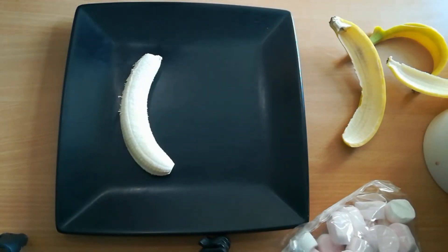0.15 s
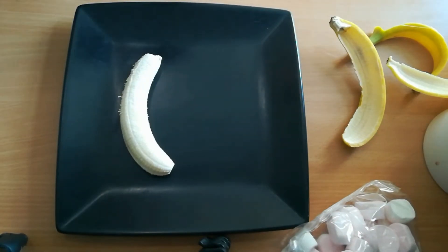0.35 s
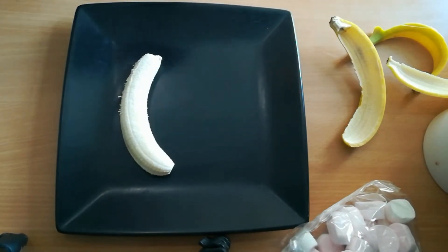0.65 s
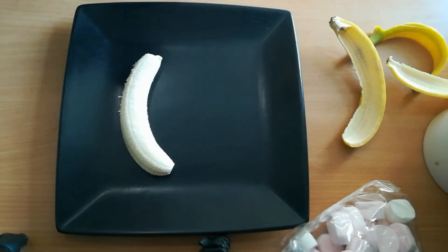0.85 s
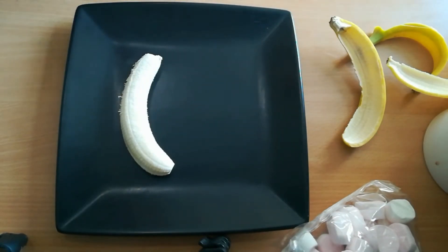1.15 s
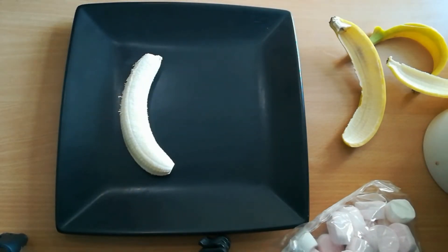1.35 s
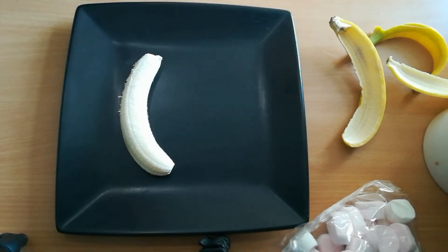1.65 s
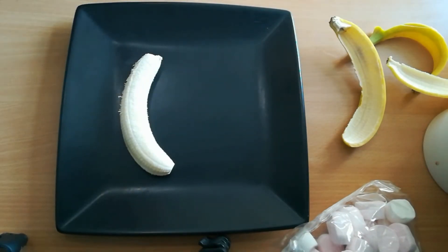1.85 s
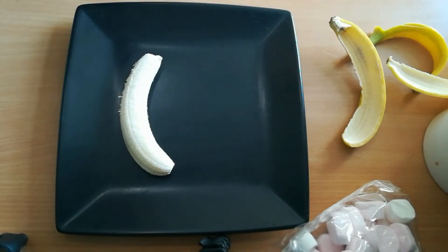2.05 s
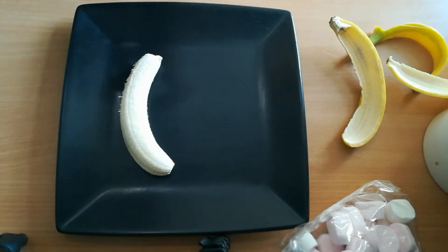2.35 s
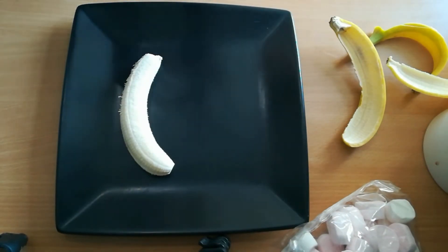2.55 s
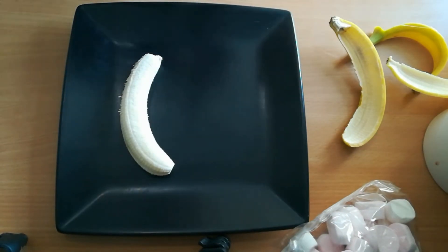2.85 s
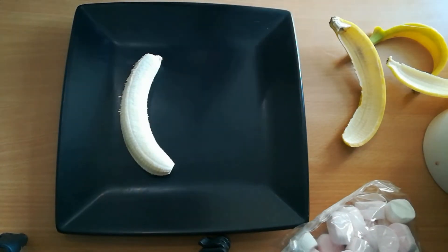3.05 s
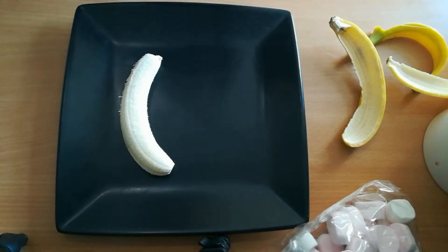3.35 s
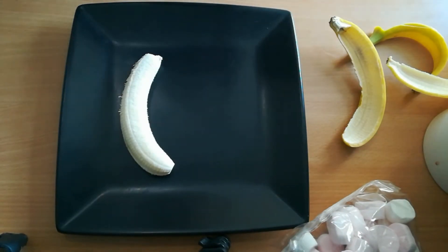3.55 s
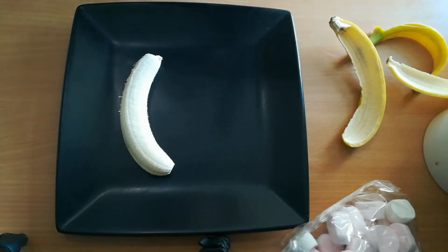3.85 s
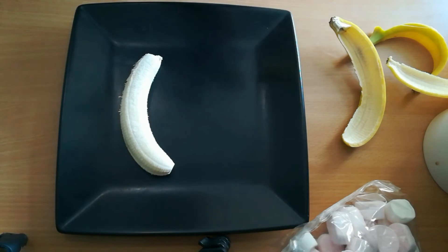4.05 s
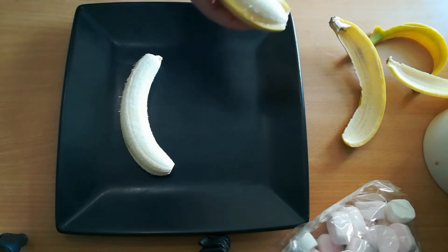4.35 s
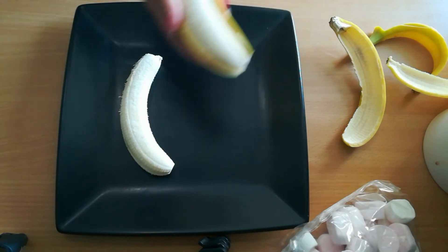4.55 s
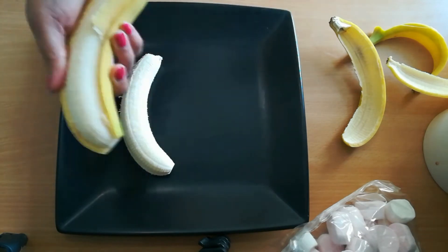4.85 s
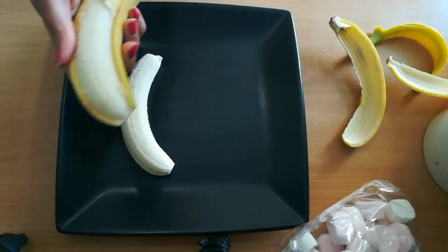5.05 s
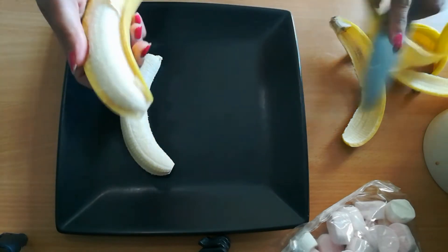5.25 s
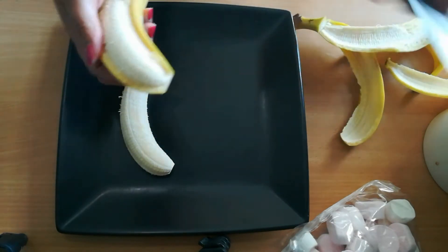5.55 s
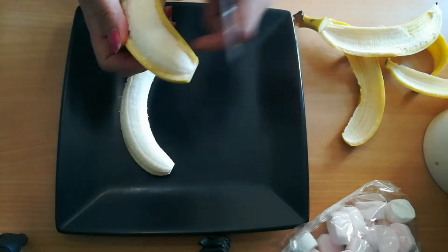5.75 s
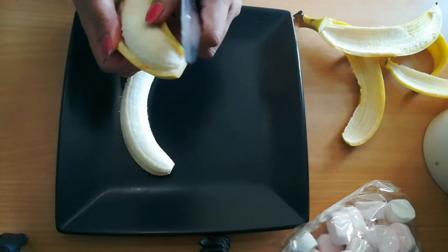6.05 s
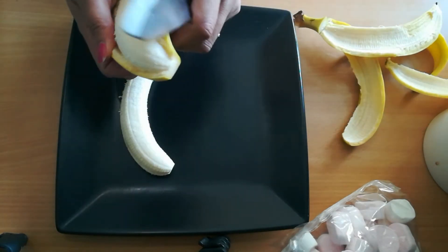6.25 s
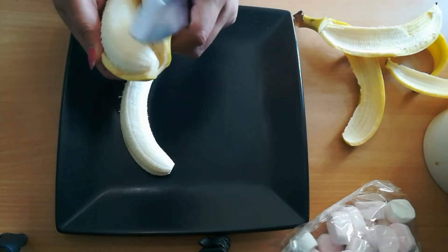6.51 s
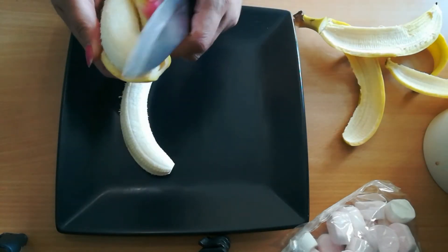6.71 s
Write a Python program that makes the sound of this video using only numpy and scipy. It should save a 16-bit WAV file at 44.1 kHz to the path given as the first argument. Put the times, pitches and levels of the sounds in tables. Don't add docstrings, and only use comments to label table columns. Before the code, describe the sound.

Close up in a small hard room, a knife bangs down loudly, metal rocks to rest, and fruit peel is torn with short dry crackling.

```python
import sys
import numpy as np
from scipy import signal
from scipy.fft import rfft, irfft, next_fast_len
from scipy.io import wavfile

SR = 44100
rng = np.random.default_rng(int(sys.argv[2]) if len(sys.argv) > 2 else 0)


def output_pcm(signal):
    pcm = np.clip(np.atleast_2d(signal).T, -1, 1) * 32767
    wavfile.write(sys.argv[1], SR, np.round(pcm).astype(np.int16))


def invert_db(level):
    return 10 ** (np.asarray(level, dtype=float) / 20)


N = 303275

# time in seconds, rumble level in dB.
STIR = [(0.0, -45.5), (0.48, -57.5), (0.62, -53), (1.25, -58), (1.7, -54), (2.45, -61), (2.7, -62),
        (5.95, -64), (6.09, -57), (6.22, -48.5), (6.4, -53.5), (6.61, -56.5), (6.88, -58)]
# frequency in Hz, width in Hz, level in dB.
RUMBLE_MODES = [(22.6, 5.6, 1.8), (52, 19, -3), (119.5, 8.2, 1.5), (160, 12, 0), (223, 14, -15)]
# frequency in Hz, level in dB per Hz.
HISS = [(120, -45.5), (200, -11.5), (387, -4.5), (473, -11), (509, -8.5), (899, -14), (1300, -12),
        (2470, -19.5), (2650, -17.5), (16000, -26)]
# frequency in Hz, level in dB rms.
HUM = [(879, -82.5), (14800, -97.5)]
QUIET_DB, HISS_DB = -64, -74
HISS_FOLLOWS = 0.44

# frequency in Hz, T60 in seconds.
ROOM_T60 = [(100, 0.75), (500, 0.49), (2000, 0.44), (6000, 0.34), (14000, 0.22)]
# time in seconds, lateness at the left microphone in samples,
# left-right difference in dB.
PLACE = [(0, 17, -0.96), (2.45, 15.5, -0.7), (2.6, -1.5, 0), (3.4, -1.36, 0.75), (4.2, -1, 4.5),
         (4.6, -1.5, -1.3), (5.0, 27.5, 5), (6.6, 29, -1.5), (6.7, -23.5, 3.5)]
HARD_WET_DB = -.5

SQUEAL_HZ = (3296, 3165, 2450)
# start in seconds, length in seconds, level in dB rms.
SQUEALS = [
    [(3.27, 0.11, -67), (3.44, .31, -60.5), (6.02, 0.21, -63.5), (6.22, 0.16, -61), (6.36, 0.2, -72.5)],
    [(5.87, 0.12, -75), (5.98, 0.079, -63.5), (6.16, 0.093, -80.5)],
    [(5.4, 0.41, -89.5), (6.0, 0.47, -81.5)],
]
SQUEAL_EDGE_S = 0.035

# time in seconds, peak in dB, upper modes in dB re peak.
ROCKS = [(2.2876, -44, 0), (2.3993, -44.5, -1), (2.5363, -57.5, -2), (2.7013, -67.5, 7.5),
         (2.827, -60.5, 1), (2.9507, -66.5, 2), (3.0541, -68.5, 5.5), (3.0984, -72, -14),
         (3.1458, -61.5, 3), (3.282, -71, -6)]
# frequency in Hz, level in dB, T60 in seconds.
STEEL = [(1125, -3, .2), (1172, 0, .25), (1228, -1, .2), (1275, -1, .2), (1570, -8, .2), (2392, 0, .25),
         (2445, -5, .2), (2487, -4, .2)]

# start in seconds, hold in seconds,
# clatter level in dB, dull part in dB re clatter, top part in dB re clatter.
CLATTER = [(0.137, 0.062, -53, 0, -21.5), (0.307, 0.0083, -17, -5.5, -13.5), (0.42, 0.088, -70.5, 24, -9),
           (0.72, 0.41, -73.5, 9, -4), (1.765, 0.005, -30, 6, -12.5), (1.941, 0.005, -10, -8.5, -12.5),
           (1.965, 0.01, -19.5, -8.5, -7), (2.026, 0.0054, -13.5, -6, -10), (2.12, 0.04, -46, 2.5, -36),
           (2.378, 0.0057, -37.5, -14, -14.5)]
CLATTER_FADE_DB_PER_S = 215.5
RISE_S = 0.0043

# time in seconds, peak in dB, then deep boom, thud and mid body in dB re peak.
KNOCKS = [(0.1375, -29, -36.5, -12.5, -39), (0.306, -7, -18.5, -22, -42), (0.3248, -8.5, -7, -8, -15.5),
          (0.455, -51.5, 21, 16.5, -14), (0.7434, -66, 23, 12.5, 15), (0.98, -63, 5, 11.5, 8),
          (1.1294, -54.5, -15, 1.5, 0.5), (1.7611, 1, -31, -24.5, -13.5), (1.8673, -9, -24.5, -28, -12.5),
          (1.8887, -11, -23, -27.5, -13.5), (1.9405, 7.5, -29, -26, -21), (1.964, -8, -15.5, -20.5, -25.5),
          (2.0256, -6, -14, -18.5, -23.5), (2.293, -27.5, -21, -14.5, -21), (2.34, -37.5, -6.5, -3, -7.5),
          (2.376, -16, -32.5, -30.5, -15), (5.3175, -61, -2, 1.5, -12.5)]
# frequency in Hz, level in dB per Hz.
CRACK = [(180, -27.5), (300, -7.5), (1010, 2.5), (1410, 1.5), (2280, -7), (4020, -1), (7820, -20),
         (14700, -32), (16000, -34)]
# frequency in Hz, level in dB, T60 in seconds.
TABLE = [(44.6, -12.5, .5), (80.4, -5.5, 0.3), (102, -2.5, .45), (129.2, -1.5, 0.33), (161.1, -5, .3),
         (202.55, -1.7, 0.25), (232, -3, 0.5), (246.2, -1.5, 0.38), (289, -11, 0.087), (324, -9.5, .2),
         (395, -13, 0.49)]
# frequency in Hz, level in dB, T60 in seconds.
BOARD = [(500, -6, .05), (620, -6, .05), (790, .3, .08), (930, -3, .05), (1180, -4, .04), (1425, -2, .05)]
# frequency in Hz, level in dB, T60 in seconds.
BLADE = [(2160, -12, .12), (2420, -23, .3), (2830, -9, .1), (4350, -8, .35), (4750, -9, .1),
         (5300, -6, .08), (5400, -4, .1), (5535, -6, .22), (5650, -5, .2), (5690, -4, .12),
         (7800, -12, .08), (8660, -10, .08), (8860, -9, .12)]
# time in seconds, peak in dB.
CLINKS = [
    (0.3092, -27),
    (1.9644, -4),
    (2.0248, -4),
    (2.2957, -39.5),
]

# time in seconds, peak in dB, centre in Hz, top crack in dB re peak.
SNAPS = [(0.2146, -37.5, 4800, -18), (0.5248, -40.5, 5200, -10.5), (1.0802, -39.5, 3550, -12),
         (1.0949, -37.5, 5100, 11), (1.25, -51, 5680, -13.5), (1.472, -17, 6000, -8.5),
         (1.5262, -11.5, 5780, 3), (2.6471, -35, 9100, 22), (3.1971, -27.5, 5230, -18),
         (3.2192, -26.5, 5050, 3), (3.2464, -22, 5260, -4.5), (3.3722, -12.5, 5150, -3),
         (3.428, -21, 6200, -1), (3.4885, -25.5, 5300, 1), (3.55, -27.5, 6100, 3.5),
         (3.6493, -37, 5800, -6), (3.689, -30.5, 4750, 11), (3.7586, -32.5, 6160, -5), (3.8, -44, 6640, 8),
         (4.0611, -27, 5600, -12), (4.5636, -40, 6300, -17), (4.577, -35, 5400, -4),
         (4.597, -32.5, 4830, 0.5), (5.082, -51.5, 2870, -10), (5.1737, -44, 5430, -10.5),
         (6.1054, -51.5, 6126, -22), (6.2656, -39.5, 5300, -24), (6.4378, -49.5, 4500, -13.5),
         (6.607, -56.5, 5240, -20.5), (6.77, -30.5, 7670, 4)]
SNAP_S = 0.0023

# frequency in Hz, width in Hz, level in dB.
SKIN = [(1800, 550, 0), (3150, 1400, -5), (5300, 2300, 0), (8500, 6000, -7), (14000, 9000, -7)]
# start in seconds, hold in seconds, crackle level in dB,
# dull part in dB re crackle, top part in dB re crackle.
TEARS = [(1.09, .012, -60, -4, 5), (1.472, 0.024, -35.5, -7, 4), (1.498, 0.034, -35.5, -15, 10.5),
         (2.647, 0.021, -67.5, -21.5, 9.5), (3.197, 0.016, -35.5, -19, -10.5), (3.244, .006, -57, -31, -8),
         (3.36, 0.013, -27.5, -13, -3), (3.39, 0.053, -60, 4, -9), (5.2, 0.026, -60.5, -12, -1.3)]
TEAR_FADE_DB_PER_S = 414
# time in seconds, effort as crackle level in dB.
PULLS = [
    [(3.548, -57), (3.63, -58.5), (3.69, -48), (3.745, -52.5), (3.762, -41), (3.87, -44.5), (3.93, -57.5),
     (4.045, -55)],
    [(4.035, -51), (4.06, -42.5), (4.1, -42), (4.275, -42), (4.295, -46), (4.42, -41.5), (4.465, -35.5),
     (4.53, -46.5), (4.605, -54)],
    [(5.9, -74.5), (6.07, -67.5), (6.22, -53.5), (6.28, -63), (6.36, -80), (6.45, -73.5), (6.52, -79.5)],
]
PULL_DULL_DB, PULL_TOP_DB, DULL_PER_EFFORT = -14.5, -1.34, 0.57


def at_hz(points, hz):
    table_hz, values = np.transpose(points)
    return np.interp(np.log(hz), np.log(table_hz), values)


def in_time(rows):
    s, *columns = np.transpose(rows)
    return [np.interp(np.arange(N) / SR, s, c) for c in columns]


def unit(x):
    return x / np.sqrt(np.mean(x ** 2) + 1e-20)


def band(x, low_hz, high_hz):
    sos = signal.butter(2, [low_hz, min(high_hz, .45 * SR)], "band", fs=SR, output="sos")
    return signal.sosfilt(sos, x)


def colour(x, spectrum):
    size = next_fast_len(N)
    hz = np.maximum(np.arange(size // 2 + 1) * SR / size, 1)
    return irfft(rfft(x, size) * invert_db(at_hz(spectrum, hz)), size)[..., :N]


def resonate(x, hz, width):
    r = np.exp(-np.pi * width / SR)
    poles = [1, -2 * r * np.cos(2 * np.pi * hz / SR), r * r]
    return signal.lfilter(np.array([1, 0, -1]) * (1 - r * r) / 2, poles, x)


def strike(modes, times, db, spread_db):
    uneven = rng.normal(0, 1, (len(times), len(modes))) * spread_db
    db = np.reshape(db, (len(times), -1)) + uneven
    out = np.zeros(N)
    for k, (hz, mode_db, t60) in enumerate(modes):
        clicks = np.full(N, 1e-18)
        clicks[(np.array(times) * SR).astype(int)] = invert_db(db[:, k] + mode_db)
        r, w = invert_db(-60 / (t60 * SR)), 2 * np.pi * hz / SR
        out += signal.lfilter([0, np.sin(w)], [1, -2 * r * np.cos(w), r * r], clicks)
    return out


def bursts(times, db, lengths):
    t = np.arange(3000) / SR
    return [(int(s * SR), invert_db(d) * np.exp(-t / max(n, 2e-4))) for s, d, n in zip(times, db, lengths)]


def grains(per_s, spread_db):
    sizes = invert_db(spread_db * np.minimum(rng.exponential(1, N), 3.6)) * rng.choice([-1, 1], N)
    return unit(sizes * (rng.random(N) < per_s / SR) + 1e-18)


def strokes(rows, fade_db_per_s, dull, middle, top):
    out, t = np.zeros(N), np.arange(SR) / SR
    for s, hold, level, low, high in rows:
        at = int(s * SR)
        fade_db = fade_db_per_s * np.maximum(t - hold, 0)
        shape = invert_db(level - 6.5 - fade_db) * np.clip(t / RISE_S, 0, 1)
        rubbing = middle + invert_db(low - 2.0) * dull + invert_db(high) * top
        add(out, at, shape * rubbing[at:at + len(t)])
    return out


def add(out, at, piece):
    out[..., at:at + piece.shape[-1]] += piece[..., :N - at]


def pan(x, db):
    return x * np.array([invert_db(db / 2), invert_db(-db / 2)]).reshape(2, -1)


def spaced(x):
    n, lag = np.arange(N), in_time(PLACE)[0]
    heard = []
    for side, channel in zip((1, -1), x):
        late = np.round(np.maximum(lag * side, 0)).astype(int)
        heard.append(channel[np.clip(n - late, 0, N - 1)])
    return np.array(heard)


def room(x, wet_db):
    t, tail = np.arange(SR // 2) / SR, 0
    edges = 60 * 2 ** np.arange(0, 8.3, .75)
    for low, high in zip(edges, edges[1:]):
        rounds = t / at_hz(ROOM_T60, np.sqrt(low * high))
        dying = invert_db(-60 * rounds - 75 * (rounds / 0.5) ** 4)
        tail = tail + band(rng.standard_normal((2, len(t))), low, high) * dying
    tail = tail * np.clip(t / 0.0011, 0, 1)
    tail = tail / np.sqrt(np.sum(tail ** 2) / 2)
    return invert_db(wet_db) * signal.fftconvolve(x, tail, axes=1)[:, :N]


def background():
    common, own = rng.standard_normal(N), rng.standard_normal((2, N))
    rumble = 0
    for hz, width, db in RUMBLE_MODES:
        mode = resonate(resonate(common + 0.16 * own, hz, width), hz, 2 * width)
        rumble = rumble + invert_db(db) * unit(mode)
    hiss = colour(own + 0.14 * rng.standard_normal(N), HISS)
    hiss = hiss / np.std(band(hiss, 170, 1500))
    t, stir = np.arange(N) / SR, in_time(STIR)[0]
    hiss_level = invert_db(HISS_DB + HISS_FOLLOWS * (stir - QUIET_DB))
    hum = sum(invert_db(db) * np.sqrt(2) * np.sin(2 * np.pi * hz * t) for hz, db in HUM)
    return invert_db(stir) * unit(rumble) + hiss_level * hiss + hum


def squeal():
    out, t = np.zeros(N), np.arange(N) / SR
    for rows, hz in zip(SQUEALS, SQUEAL_HZ):
        waver_hz = 5.0 * unit(band(rng.standard_normal(N), 3, 20))
        flutter = invert_db(2.5 * unit(band(rng.standard_normal(N), 6, 30)))
        tone = flutter * np.sqrt(2) * np.sin(2 * np.pi * np.cumsum(hz + waver_hz) / SR)
        for s, length, db in rows:
            out += tone * invert_db(db) * np.clip(np.minimum(t - s, s + length - t) / SQUEAL_EDGE_S, 0, 1)
    return np.array([np.roll(out, 3), out]) * invert_db(np.array([[-2.5], [2.5]]))


def rocking():
    s, peak, upper = np.transpose(ROCKS)
    is_upper = np.array(STEEL)[:, 0] > 2000
    strength = peak[:, None] + upper[:, None] * is_upper * 0.84 - 10.5
    ring = strike(STEEL, s, strength, spread_db=5.0) * np.ones((2, 1))
    t = np.arange(N) / SR
    since_touch = t - s[np.maximum(np.searchsorted(s, t) - 1, 0)]
    choke = np.clip((.095 - since_touch) / 0.05, 0, 1)
    return (spaced(ring) + room(ring, wet_db=3.0)) * choke


def clatter():
    hits = grains(1500, spread_db=5.5) + 0.3 * rng.standard_normal(N)
    dull, middle = unit(band(hits, 330, 1900)), unit(band(hits, 2900, 9000))
    top = unit(band(hits, 7500, 14000))
    return strokes(CLATTER, CLATTER_FADE_DB_PER_S, dull, middle, top)


def knocks():
    s, peak, deep, thud, body = np.transpose(KNOCKS)
    noise, cracks = unit(colour(rng.standard_normal(N), CRACK)), np.zeros(N)
    bright, dull = band(noise, 1100, 26000), unit(band(noise, 460, 1500))
    for (at, shape), body_db in zip(bursts(s, peak - 6, [.004] * len(s)), body):
        span = slice(at, at + len(shape))
        add(cracks, at, (bright[span] + dull[span] * invert_db(body_db + 1.0)) * shape)
    clink_s, clink_db = np.transpose(CLINKS)
    blade = strike(BLADE, clink_s, clink_db - 12.5, spread_db=3.0)
    board = strike(BOARD, s, peak + body - 14, spread_db=4.5)
    is_deep = np.array(TABLE)[:, 0] < 175
    strength = peak[:, None] + np.where(is_deep, deep[:, None], thud[:, None]) - 7
    boom = band(strike(TABLE, s + 0.0069, strength, spread_db=3.0), 42, 500)
    return cracks + blade + board, boom


def snaps():
    s, peak, centre, top = np.transpose(SNAPS)
    out, noise = np.zeros(N), rng.standard_normal((len(s), 3000))
    for (at, shape), hz, top_db, draw in zip(bursts(s, peak + 2.5, [SNAP_S] * len(s)), centre, top, noise):
        burst = draw * shape
        wide = band(burst, 1700, 9000) * invert_db(-15.5)
        crack = band(burst, 7400, 26000) * invert_db(top_db - 1.5)
        ring = band(resonate(burst, hz, 0.43 * hz), 1400, 22000) * invert_db(3.5)
        piece = wide + crack + ring
        add(out, at, piece * shape[0] / np.max(np.abs(piece)))
    return out


def tears():
    rub = grains(2500, spread_db=3.0) + 1.2 * rng.standard_normal(N)
    rub = rub * invert_db(2.6 * unit(band(rng.standard_normal(N), 12, 70)))
    parts = []
    for k, (hz, width, db) in enumerate(SKIN):
        fibres = np.roll(rub, 9001 * k)
        parts.append(invert_db(db) * resonate(resonate(fibres, hz, width), hz, width))
    dull = unit(parts[0] + 0.1 * band(rub, 1160, 1680))
    middle, top = unit(parts[1] + parts[2]), unit(parts[3] + parts[4])
    t, pull = np.arange(N) / SR, np.zeros(N)
    for rows in PULLS:
        edges = np.clip(np.minimum(t - rows[0][0], rows[-1][0] - t) / 0.0034, 0, 1)
        pull += invert_db(in_time(rows)[0] - 6.0) * edges
    depth = invert_db(PULL_DULL_DB) * (pull / invert_db(-48.5)) ** DULL_PER_EFFORT
    slow = pull * (middle + depth * dull + invert_db(PULL_TOP_DB) * top)
    return slow + strokes(TEARS, TEAR_FADE_DB_PER_S, dull, middle, top)


def scene():
    cracks, boom = knocks()
    side_db = in_time(PLACE)[1]
    hard, skin = pan(cracks + clatter(), side_db), pan(snaps() + tears(), side_db)
    table = boom + room(boom * np.ones((2, 1)), wet_db=-15.0)
    near = spaced(hard + skin) + room(hard, HARD_WET_DB) + room(skin, wet_db=-4.0) + table
    return near + rocking() + squeal() + background()


def low_pass(x):
    return signal.sosfilt(signal.butter(12, 16650, fs=SR, output="sos"), x)


def record(dry):
    clipped = np.clip(dry, -.85, .85)
    rolled_off = signal.sosfilt(signal.cheby1(8, 1, 15650, fs=SR, output="sos"), clipped)
    return low_pass(rolled_off)


dry = scene()
out = record(dry)
output_pcm(out)
```